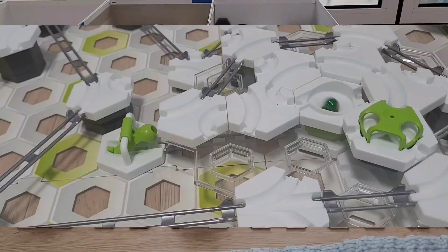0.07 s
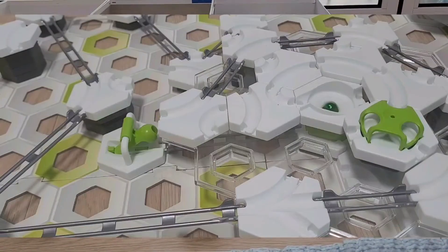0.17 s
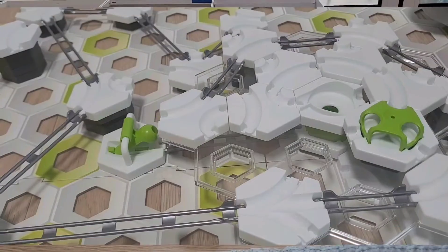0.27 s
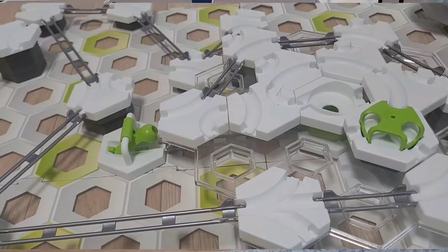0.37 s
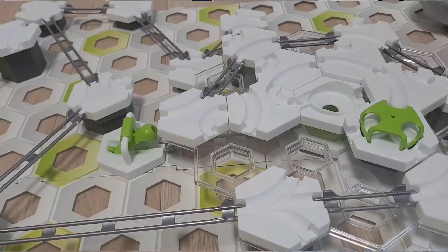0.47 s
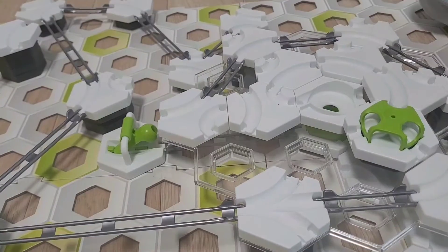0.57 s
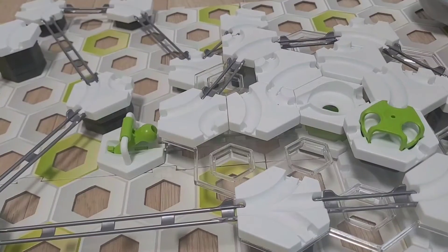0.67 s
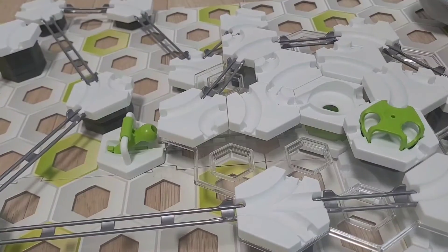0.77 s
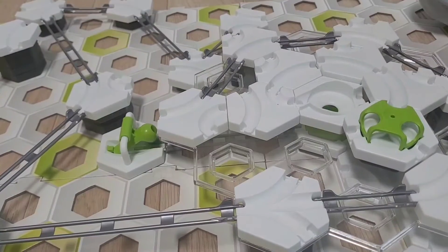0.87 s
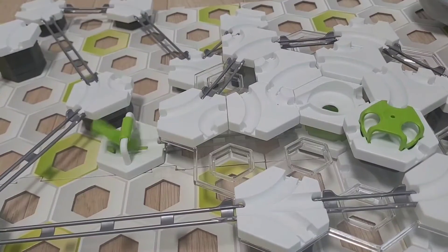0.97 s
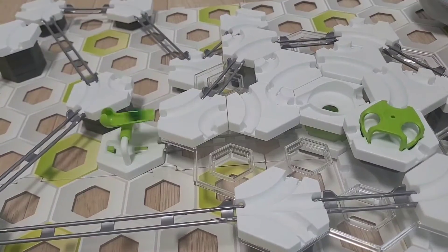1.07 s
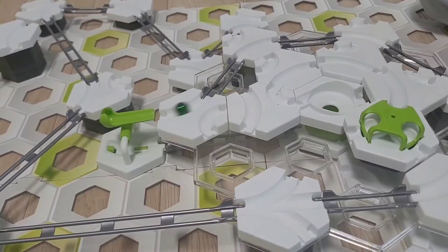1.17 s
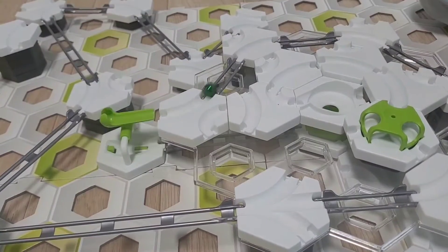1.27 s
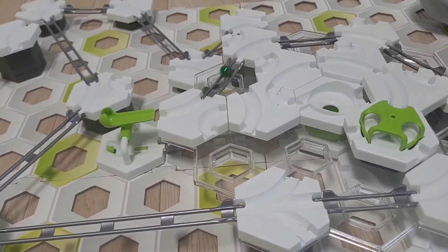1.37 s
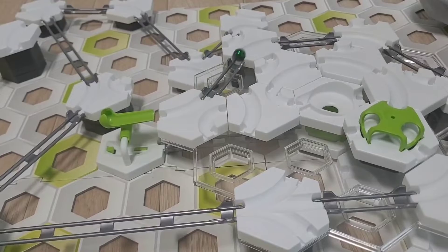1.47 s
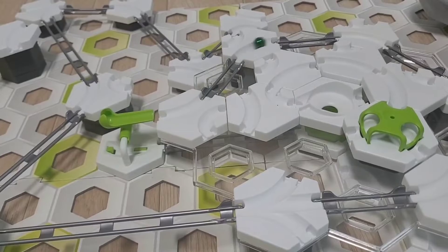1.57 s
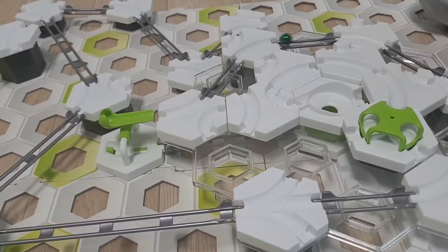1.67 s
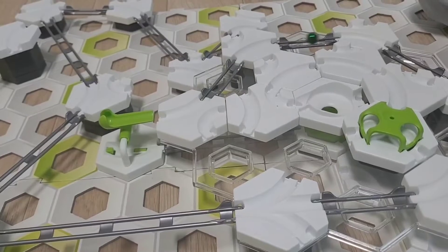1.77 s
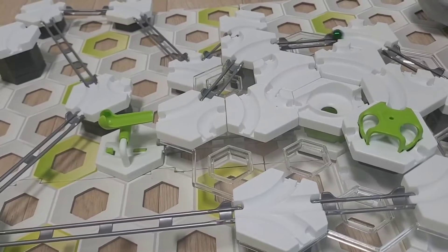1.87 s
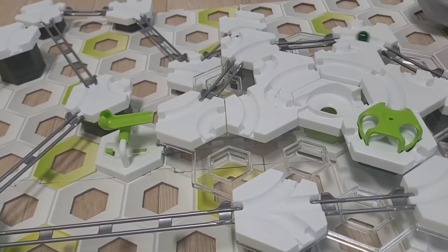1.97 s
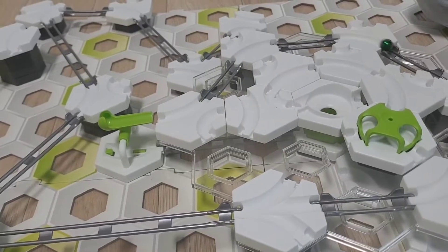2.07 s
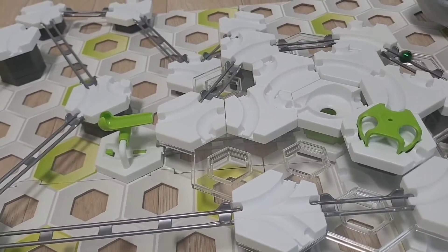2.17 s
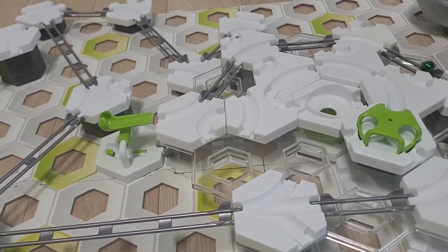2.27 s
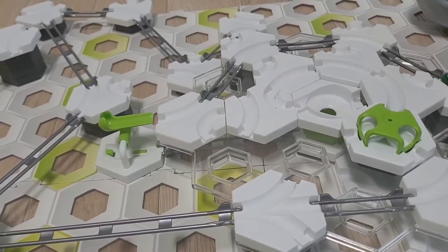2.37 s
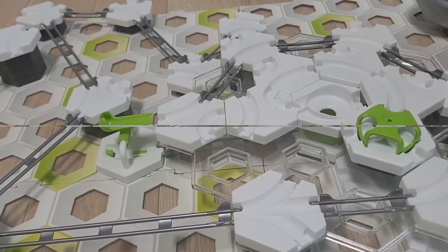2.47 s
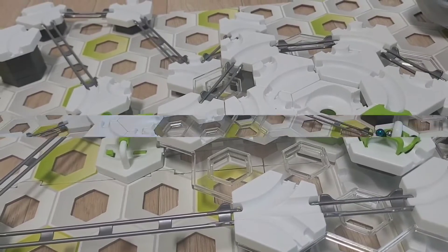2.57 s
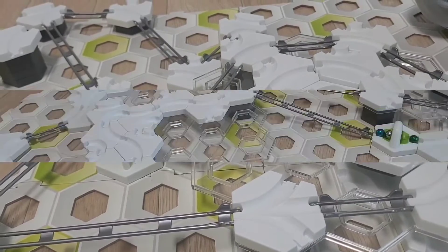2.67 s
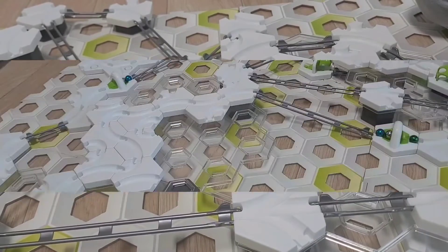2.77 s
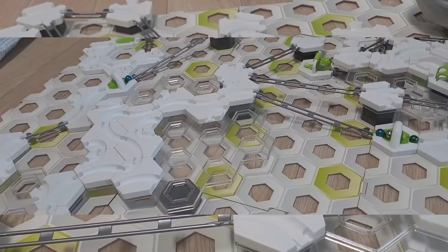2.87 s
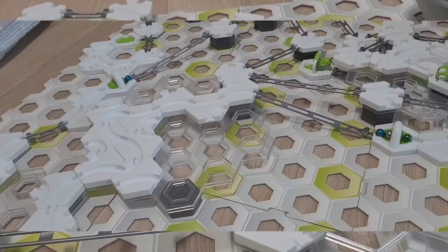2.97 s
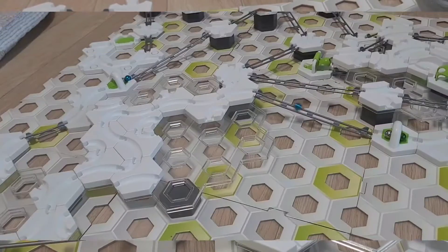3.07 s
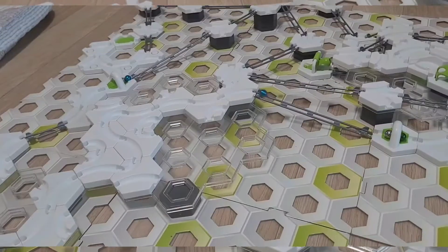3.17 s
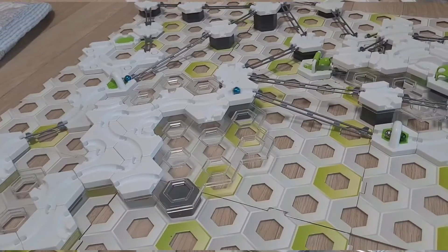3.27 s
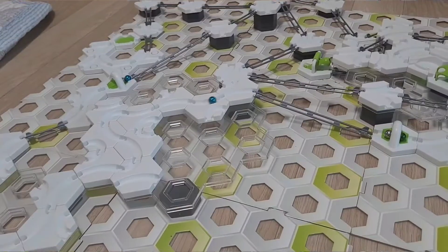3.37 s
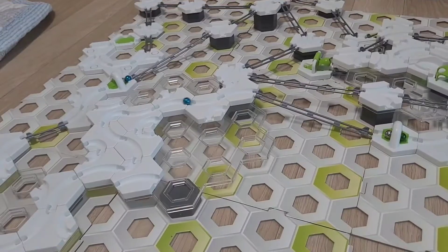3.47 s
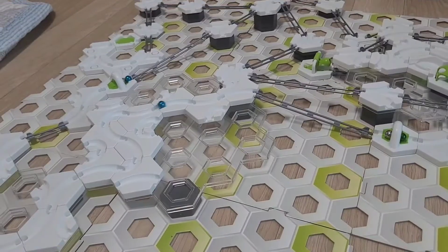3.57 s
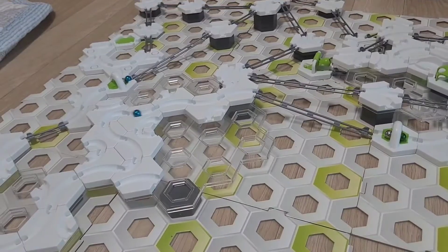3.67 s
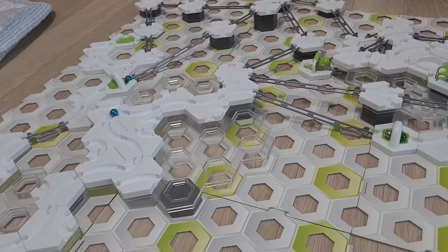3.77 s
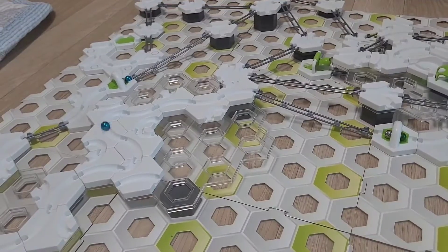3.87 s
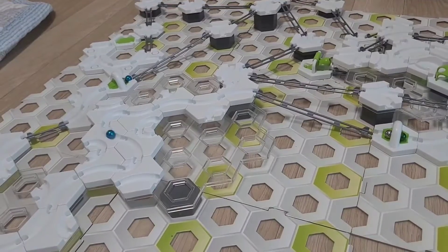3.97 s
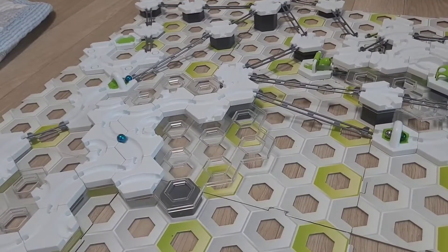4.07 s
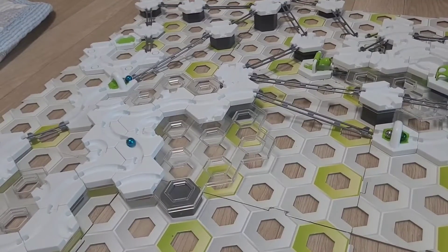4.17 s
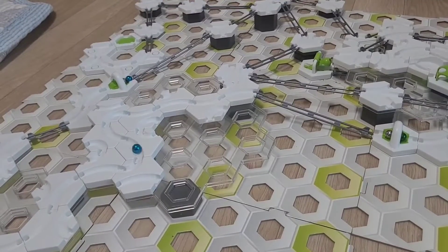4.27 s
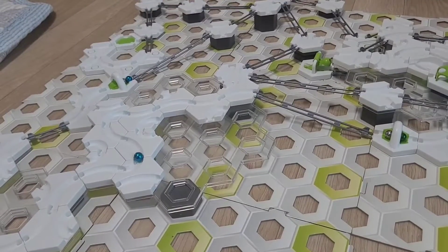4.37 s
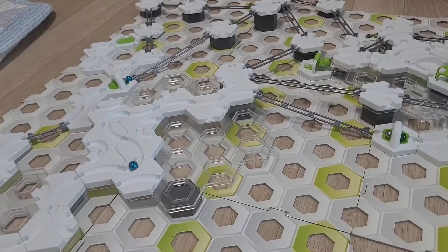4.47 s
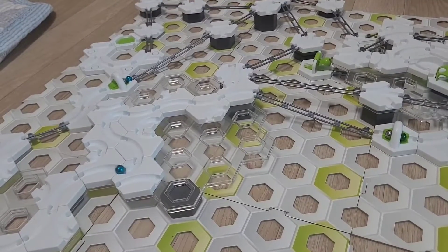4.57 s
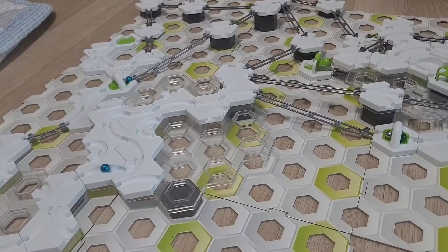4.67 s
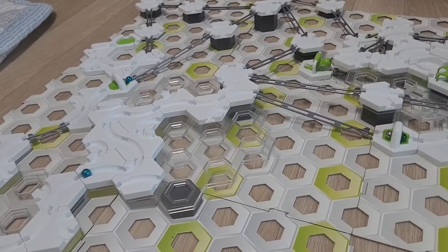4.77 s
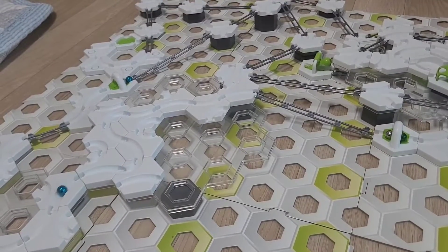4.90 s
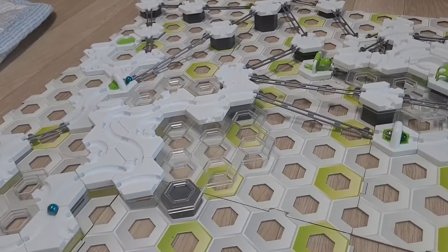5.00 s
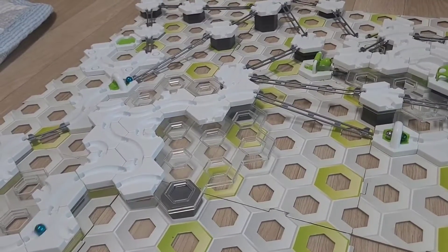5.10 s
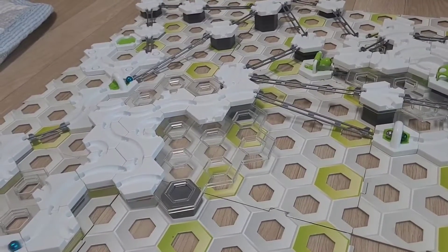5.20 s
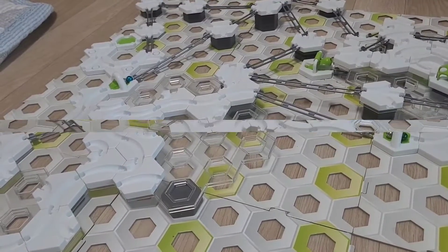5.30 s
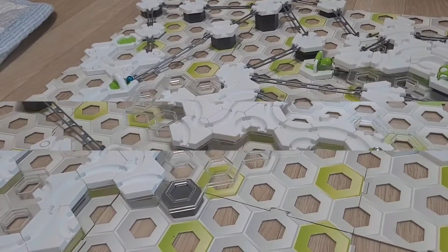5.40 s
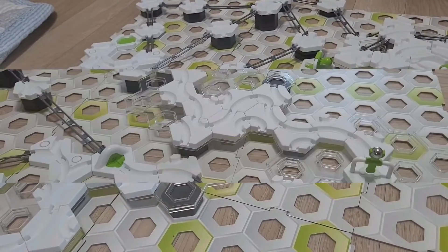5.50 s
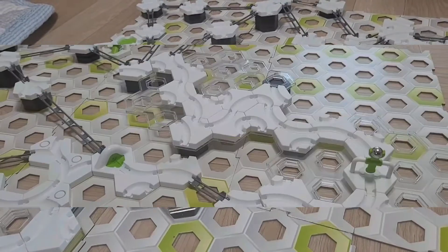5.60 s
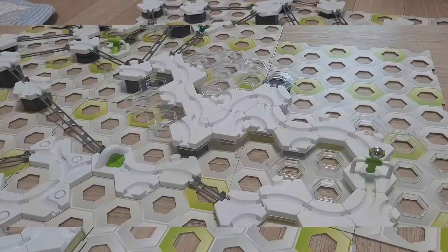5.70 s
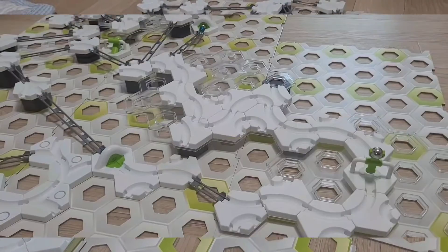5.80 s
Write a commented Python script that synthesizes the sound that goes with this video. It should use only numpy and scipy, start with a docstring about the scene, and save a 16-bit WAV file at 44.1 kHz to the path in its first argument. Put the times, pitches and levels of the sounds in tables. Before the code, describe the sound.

A toy marble run in a small room, heard close in stereo, leaning right. The first 0.17 s holds only faint hiss and soft dull bumps, mostly left, then a tiny silence. From 0.24 s a marble scuffs round a hollow plastic funnel that hums briefly, with two hard ringing knocks at 0.44 and 0.47 s. Light taps follow from 0.58 to 1.09 s, then a dense burst of sharp, bright lever clacks at 1.12-1.33 s with gritty rattle. From 1.4 s the marble rolls lightly over metal rails, clicking at joints, with a short swish near 2.2 s and a bright clack at 2.76 s. Silence at 3.03-3.12 s. At 3.17 s steel marbles clink with a thin high ring. From 3.5 s a marble rumbles over plastic tiles, tocking at seams, loudest at 5.04 s, with harder knocks at 5.55-5.61 s and a final clack at 5.8 s.

```python
"""Small room, toy marble run: marbles rumble over plastic tiles and thin metal rails, knock levers and catchers.
Scuffs, tocks, clicks and hard blows are crowds of decaying noise modes around each piece's note.
Rolling is random kicks through the track's resonances; a few sine modes ring on; dense noise echoes are the room.
Three stretches with short silences between; the first holds only soft bumps and hiss."""
import sys
import numpy as np
from scipy import signal
from scipy.fft import rfft, irfft, next_fast_len
from scipy.io import wavfile
from scipy.ndimage import uniform_filter1d

SR = 44100
rng = np.random.default_rng(int(sys.argv[2]) if len(sys.argv) > 2 else 0)


def wav_out(sig):
    """Save sig, one row per channel (or a flat mono array), as 16-bit PCM at SR to the path in sys.argv[1]."""
    wavfile.write(sys.argv[1], SR, np.round(np.clip(np.atleast_2d(sig).T, -1, 1) * 32767).astype(np.int16))


N = 257544
TIME = np.arange(N) / SR

# Pans are left minus right [dB]. Strike ranges, low to high: thock, knock, clack, tick.

# stretches with sound: (start [s], end [s])
STRETCHES = [(0, 0.17), (0.215, 3.032), (3.124, 5.801)]
# opening hiss spectrum: (frequency [Hz], relative gain [dB])
HISS_SPECTRUM = [(700, -17), (1800, -17), (2300, -2), (3200, 0), (4200, -5), (5300, -23), (8500, -25),
                 (9800, -17), (12000, -29), (16000, -33)]
# room noise spectrum: (frequency [Hz], relative gain [dB])
AIR_SPECTRUM = [(25, -23.5), (57, 1), (100, -10), (200, -12.5), (450, -17.5), (1000, -12.5), (2000, -31.5),
                (4500, -24), (9000, -23), (16000, -29)]
HISS_DB, AIR_DB = -68.99, -75.5
# dull bumps: (time [s], level before common lift [dB], top [Hz], t60 [s], pan [dB])
BUMPS = [(0.01, -53, 104, 0.56, 20), (0.052, -44.5, 360, 0.055, 25), (0.083, -46.5, 394, 0.042, 22),
         (0.092, -49.5, 96, 0.23, 17), (0.44, -41, 949, 0.08, -1), (0.467, -35, 959, 0.078, -3),
         (1.144, -53, 90, 0.22, 2.5), (2.831, -69.5, 91.3, 0.22, -11), (3.183, -64, 407, 0.28, 9),
         (5.75, -52, 95, 0.13, -17)]
# likeness of the two ears: (frequency [Hz], correlation [0-1])
LIKENESS = [(60, 0), (300, 0.8), (700, 0.91), (1400, 0.09), (3000, 0.68), (8000, 0), (16000, 0)]
# marble position: (time [s], pan before range share [dB], lead of left ear [ms])
PLACE = [(0.2, -5, -0.14), (0.9, -9, 0.023), (1.25, -1, 0.046), (1.7, -6.5, 0.09), (2.2, -6, -0.13),
         (2.9, -10, 0.008), (3.2, -2.5, 0.034), (4.4, -6, 0.066), (5.3, -2, 0.11), (5.8, -9.5, 0.17)]
# track resonances: (frequency [Hz], width [Hz], lift [dB])
TRACK_MODES = [(695, 91, 11), (807, 140, 11.5), (969, 140, 6.5), (1463, 390, 8), (2130, 65, 1.5),
               (3690, 870, 3.5), (4460, 460, 7.5), (5220, 76, 7), (5820, 580, 5), (7283, 220, 7),
               (8870, 730, 4), (11700, 390, 6), (11300, 300, -27.5)]
# room response: (frequency [Hz], t60 [s], level [dB])
ROOM = [(203.1, 0.23, 4.5), (700, 0.41, -4), (1910, 0.25, -1.5), (4900, 0.25, -9), (10000, 0.23, -1.5),
        (16050, 0.39, -12)]

# funnel hum as the marble circles: (time [s], level [dB])
CIRCLING = [(0.235, -70), (0.25, -48.5), (0.319, -69.5), (0.36, -41.5), (0.42, -57.5), (0.47, -43),
            (0.58, -52.5), (0.66, -82)]
# rolling, levels before trim: (time [s], rumble [dB], whirr [dB], grit [dB])
FUNNEL_ROLLING = [(0.25, -64, -67, -73), (0.322, -76, -82, -75.5), (0.412, -59.5, -70, -66.5),
                  (0.46, -78, -71, -71), (0.534, -64.5, -53, -46), (0.658, -77, -73, -68),
                  (0.768, -117.5, -85.5, -76), (1.01, -84, -82, -63), (1.1, -84, -64, -53)]
RAIL_ROLLING = [(1.15, -71, -44, -28.5), (1.19, -78, -49, -35.5), (1.29, -66.5, -61, -51.5),
                (1.332, -67, -47, -41), (1.43, -63.5, -54.5, -58.5), (1.56, -72.5, -75, -84),
                (1.654, -57.5, -58.5, -61), (1.92, -71.5, -61.5, -67), (2.086, -65.5, -56, -61.5),
                (2.31, -63.5, -57.5, -58.5), (2.404, -77.5, -71, -66.5), (2.498, -58, -63, -59),
                (2.654, -54, -62.5, -59), (2.754, -59, -62.5, -54), (2.842, -62, -67, -55),
                (2.952, -73.5, -77, -67), (3.02, -68, -69.5, -63)]
TILE_ROLLING = [(3.13, -62.5, -68.5, -53.5), (3.19, -80, -72, -65), (3.31, -78, -66, -62),
                (3.52, -61.5, -61, -62), (3.67, -57, -55.5, -61.5), (3.77, -58, -53, -60),
                (3.9, -55.5, -52.5, -61), (3.97, -51.5, -54, -55), (4.1, -58.5, -62.5, -67),
                (4.24, -67, -63.5, -78.5), (4.35, -63, -68.5, -82), (4.61, -61, -68, -89.5),
                (4.84, -61, -59, -62), (4.97, -62.5, -58, -61.5), (5.33, -55, -55.5, -68),
                (5.56, -56, -49.5, -65), (5.71, -63.5, -64, -66.5), (5.78, -60, -62.5, -65)]
# rolling colour: (frequency [Hz], relative gain [dB])
RAIL_COLOUR = [(88, -76), (150, -12.5), (494, -3), (649, -13.5), (1020, -24), (1210, -12), (1660, -14),
               (2870, -10.5), (6260, -25.5), (6770, -29.5), (7470, -25.5), (12200, -31.5), (16000, -48)]
TILE_COLOUR = [(88, -58), (150, -62), (226, -1.5), (524, -11.5), (689, -9), (805, -8), (1120, -7.5),
               (1420, 0.5), (2650, -8.5), (4410, -18.5), (5910, -15), (7620, -24), (9630, -23),
               (16000, -36)]

# strike ranges: (low [Hz], high [Hz])
RANGES = [(480, 1100), (1100, 2800), (2800, 6500), (6500, 14500)]
# hollow tocks, funnel scuffs and knocks early on, then tile seams:
# (time [s], level [dB], brightness [dB per range], note of the piece [Hz], t60 before range share [s])
TOCKS = [(0.2442, -52, 3.5, 764, 0.098), (0.3495, -47.5, 2.5, 720, 0.12), (0.36, -33.5, -1, 872, 0.063),
         (1.4127, -43.5, -0.5, 1330, 0.017), (3.551, -46, -3, 1586, 0.12), (3.676, -38.5, -2, 1750, 0.038),
         (3.6876, -40.5, 2, 1600, 0.048), (3.81, -39.5, -3.5, 1664, 0.093), (3.9448, -39, 0, 890, 0.043),
         (3.9555, -41, 4.5, 5240, .027), (4.007, -36, -3.5, 947, 0.028), (4.0556, -37, 3.5, 5070, 0.049),
         (4.285, -50.5, -2, 777, 0.041), (4.3065, -48, -4, 1610, .04), (4.5978, -46, -1, 1640, 0.021),
         (4.642, -50, -6.5, 826, .03), (4.8007, -38.5, -2, 1850, .035), (4.918, -47, 0, 1020, 0.028),
         (4.934, -47, -2.5, 1410, 0.051), (5.0227, -45.5, 0.5, 2100, .028), (5.037, -26.5, 1, 1350, 0.036),
         (5.179, -44.5, -5, 1340, 0.048), (5.2152, -37.5, 4, 1565, 0.035), (5.375, -44, -4.5, 1330, 0.044),
         (5.3933, -38, 0.5, 1460, 0.038), (5.5094, -45.5, -6.5, 1230, .04), (5.5638, -34, 0, 2280, 0.063),
         (5.7825, -38.5, 0.5, 1720, 0.027)]
# tock balance: (thock [dB], knock [dB], clack [dB], tick [dB])
TOCK_SHAPE_DB = (-9.5, -1, -4.5, -15)
# scuffs as the marble swirls into the funnel, then hard blows on funnel, lever and catchers:
# (time [s], clack level [dB], body re clack [dB], edge re clack [dB], note [Hz], rise [s],
# t60 before range share [s], pan before range share [dB], room send before range trim [dB])
SCUFFS_AND_BLOWS = [(0.3709, -30.5, -6.5, -10, 4200, 0.0033, 0.055, -9, -5),
                    (0.3833, -30.5, -0.5, -7.5, 4070, 0.0025, 0.06, -10.5, -10.5),
                    (0.4385, -17.5, -10, -1, 4170, 0.0003, 0.067, -10, -1.5),
                    (0.4689, -16, -18.5, -6.5, 3730, 0.00094, 0.027, -10.5, -3),
                    (1.1183, -28, -26, -2.5, 7540, 0.001, 0.028, -8, 5.5),
                    (1.1348, -29, -22, 3.5, 4500, 0.00048, 0.034, -6, 13.5),
                    (1.1434, -22.5, -29, 3, 12940, 0.00055, 0.0096, -7.5, 3),
                    (1.1587, -27.5, -15, 5.5, 13100, 0.00024, 0.043, -10.5, -3),
                    (1.2195, -32.5, -27, 1, 7800, .0013, .066, -21, 1),
                    (1.234, -33, -18.5, -4, 4460, .0028, 0.1, -8, -27),
                    (1.303, -30, -3.5, -5.5, 4540, 0.0024, 0.044, -11.5, -13),
                    (1.327, -23.5, -4.5, -5, 4490, 0.00021, 0.081, -10, -5.5),
                    (2.7627, -29.5, -16.5, -3.5, 7950, 0.00062, 0.041, -13, -13.5),
                    (2.7655, -40.5, -11, -9.5, 5050, 0.00053, 0.066, -10, -7),
                    (3.159, -46.5, -5, 7, 11400, 0.001, 0.12, -5, -3.5),
                    (3.168, -33.5, -31, 10, 10460, 0.00034, 0.0067, -19, 8.5),
                    (3.1799, -39, -9, 14.5, 13000, 0.0027, 0.13, 3, 4.5),
                    (5.5522, -28, -4, -17, 2094, 0.00048, 0.04, -3, -6),
                    (5.6076, -31, 0.5, 1.5, 6670, 0.0002, 0.034, -4.5, 1.5),
                    (5.7963, -29, -1, 10.5, 6940, 0.00025, 0.013, -3, -29)]
# light taps of marble and lever settling:
# (time [s], level [dB], edge re level [dB], rise [s], t60 before range share [s])
TAPS = [(0.5808, -38, -6.5, 0.008, .032), (0.6639, -40, -4, 0.0032, .034),
        (0.9596, -40, -5.5, 0.0065, .033), (0.981, -37.5, -4, 0.0053, .025),
        (1.035, -35.5, -6.5, .0008, .021), (1.0883, -41.5, -17.5, .0006, .013)]
# tap balance: (thock [dB], knock [dB], clack [dB])
TAP_SHAPE_DB = (-26, -12.5, -0.5)
# rail joints, two touches each: (time [s], level [dB], second touch delay [s], second touch level [dB],
# note [Hz], brightness [dB per range])
JOINTS = [(1.4544, -36, 0.0018, -43, 4200, 1), (1.5141, -43.5, 0.01, -41.5, 3730, -1),
          (1.5783, -44, .016, -38, 3270, -1), (1.6441, -38.5, 0.0081, -61, 3610, -4.5),
          (1.832, -41.5, .004, -41, 4800, 0.5), (1.9066, -46, 0.0085, -53, 3030, 2),
          (1.9818, -47.5, 0.0059, -44, 2880, -2.5), (2.0553, -45.5, 0.0036, -58, 1180, -5),
          (2.2631, -40.5, 0.0063, -47.5, 3430, 1.5), (2.346, -47, 0.0075, -44.5, 3200, -1.5),
          (2.4298, -43.5, .0122, -39, 3220, 0.5), (2.514, -39.5, 0.0051, -51, 4020, -2),
          (2.8556, -44, 0.0093, -42.5, 4900, 2.5), (2.944, -45.5, 0.0089, -43, 6800, 2.5),
          (3.369, -44.5, 0.0095, -39.5, 4800, 3.5), (3.398, -44, 0.028, -40.5, 4750, -3.5)]
# joint balance: (thock [dB], knock [dB], clack [dB], tick [dB])
JOINT_SHAPE_DB = (-17, -6, 0, -6)

# ringing of the funnel, the lever and the steel marbles in their holder:
# (frequency [Hz], level before panning [dB], t60 [s])
FUNNEL_MODES = [(781, -38, 0.1), (815, -38.5, .25), (2123, -29.5, 0.2), (3795, -45, .16), (3900, -37, .16),
                (4020, -46, 0.18), (5540, -49.5, .19)]
LEVER_MODES = [(4270, -29, 0.031), (5600, -45, .04)]
STEEL_MODES = [(229, -59.5, 0.38), (960, -60, .4), (10346, -43.5, .26), (11353, -39, .26),
               (12246, -34, .28), (12472, -39.5, .3), (13175, -38, .3), (14033, -40, .26)]
# thin whirr resonances: (frequency [Hz], relative level [dB])
WHIRR_MODES = [(1020, -17.5), (2220, -21), (4330, -1), (8900, -8.5)]


def from_db(db):
    """Decibels to gain."""
    return 10 ** (np.asarray(db) / 20)


def rms_one(x):
    """Scales to rms 1."""
    return x / np.sqrt(np.mean(x ** 2) + 1e-20)


def in_time(rows, at=TIME):
    """Each column of a time curve, interpolated."""
    s, *columns = np.transpose(rows)
    return [np.interp(at, s, column) for column in columns]


def at_hz(points, hz, axis=1):
    """One table column, interpolated over log frequency."""
    points = np.array(points)
    return np.interp(np.log(np.maximum(hz, 1)), np.log(points[:, 0]), points[:, axis])


def during(start_s, end_s):
    """1 between two times, with 20 ms edges."""
    return np.interp(TIME, [start_s - .01, start_s + .01, end_s - .01, end_s + .01], [0, 1, 1, 0])


def drift(per_s):
    """Smooth random wander: Gaussian knots joined by lines."""
    knots = rng.standard_normal(512)
    return np.interp(TIME * per_s, np.arange(len(knots)), knots)


def band(x, low_hz, high_hz, order=3):
    """Band-pass."""
    edges = [low_hz, min(high_hz, .48 * SR)]
    return signal.sosfilt(signal.butter(order, edges, "band", fs=SR, output="sos"), x)


def resonance(x, hz, width_hz):
    """One resonance, unity gain at its peak."""
    return signal.lfilter(*signal.iirpeak(hz, hz / width_hz, fs=SR), x)


def coloured(x, spectrum):
    """Imposes a spectrum; rms 1."""
    size = next_fast_len(N)
    gain = from_db(at_hz(spectrum, np.fft.rfftfreq(size, 1 / SR)))
    return rms_one(irfft(rfft(x, size) * gain, size)[..., :N])


def two_ears(pair, lead_ms=0):
    """Mixes two unrelated signals to left and right with likeness set by frequency; left leads."""
    length = pair.shape[1]
    size = next_fast_len(length)
    hz = np.fft.rfftfreq(size, 1 / SR)
    alike = np.clip(at_hz(LIKENESS, hz), 0, 1)
    mid, side = rfft(pair, size)
    sign = np.array([[1], [-1]])
    ears = np.sqrt((1 + alike) / 2) * mid + sign * np.sqrt((1 - alike) / 2) * side
    shift = np.exp(sign * 1j * np.pi * hz * lead_ms / 1000)  # half the lead on each ear
    return irfft(ears * shift, size)[:, :length]


def panned(pan_db):
    """Left and right gains of constant power."""
    gains = from_db(np.array([[.5], [-.5]]) * pan_db)
    return gains / np.sqrt(np.mean(gains ** 2, axis=0))


def add(out, s, sound):
    """Mixes a sound in at a given time."""
    start = max(int(s * SR), 0)
    out[:, start:start + sound.shape[1]] += sound[:, :N - start]


def track_body(x):
    """Hollow pieces filter whatever shakes them, one resonance after another."""
    for hz, width_hz, lift_db in TRACK_MODES:
        x = x + (from_db(lift_db) - 1) * resonance(x, hz, width_hz)
    return x


def background(hiss_pan_db=15):
    """Thin hiss, mostly left, in the first stretch; quiet room noise after it."""
    air = from_db(AIR_DB) * coloured(two_ears(rng.standard_normal((2, N))), AIR_SPECTRUM)
    hiss = from_db(HISS_DB) * coloured(rng.standard_normal((2, N)), HISS_SPECTRUM) * panned(hiss_pan_db)
    return np.where(TIME < STRETCHES[0][1], hiss, air)


def bumps(rise_s=.003, lift_db=8.5):
    """Soft, dull thuds: band-limited noise, quick rise, exponential decay."""
    out, t = np.zeros((2, N)), np.arange(SR // 4) / SR
    for s, level_db, top_hz, t60_s, pan_db in BUMPS:
        noise = two_ears(rng.standard_normal((2, SR // 2)))
        noise = band(noise, top_hz / 3, top_hz)[:, -len(t):]  # filter settled
        thud = noise * (1 - np.exp(-t / rise_s)) * from_db(-60 * t / t60_s)
        add(out, s, thud / np.abs(thud).max() * from_db(level_db + lift_db) * panned(pan_db))
    return out


def funnel_hum(note_hz=790, section_width_hz=330, pan_db=-2):
    """The hollow funnel hums as the marble circles: noise through two equal resonances."""
    noise = two_ears(rng.standard_normal((2, N)))
    tone = resonance(resonance(noise, note_hz, section_width_hz), note_hz, section_width_hz)
    level = from_db(in_time(CIRCLING)[0]) * during(CIRCLING[0][0], CIRCLING[-1][0])
    return level * rms_one(tone) * panned(pan_db)


def tocks(rise_s=0.0015, pan_db=-8.0, room_db=-2):
    """Hollow tocks: funnel scuffs and knocks early on, then tile seams; each tilts bright or dull."""
    steps = np.arange(len(RANGES)) - 1
    return [(s, db + np.array(TOCK_SHAPE_DB) + bright_db * steps, note_hz, rise_s, t60_s, pan_db, room_db)
            for s, db, bright_db, note_hz, t60_s in TOCKS]


def strikes(blows, crack=0.56, crack_at_s=0.0028, crack_width_s=0.00031, note_lift_db=9, note_q=13,
            ring_share=(1.3, 1.2, 1.0, .9), pan_share=(.2, .45, 1.1, .8), room_trim_db=(0, 0, 0, -1)):
    """Each strike excites short-lived modes around its piece's note; returns direct sound and room feed."""
    direct, to_room = np.zeros((2, 2, N))
    t = np.arange(3584) / SR
    first = t < .006  # level reference [s]
    white = track_body(rng.standard_normal((len(blows), 2, 4096)))
    crowd = []
    for noise, (s, _, note_hz, *_) in zip(white, blows):
        noise = noise + from_db(note_lift_db) * resonance(noise, note_hz, note_hz / note_q)
        crowd.append(two_ears(noise, in_time(PLACE, s)[1]))
    # a brief crack about 3 ms into each blow
    crack_gain = 1 + crack * np.exp(-((t - crack_at_s) / crack_width_s) ** 2)
    for k, (low_hz, high_hz) in enumerate(RANGES):
        in_range = band(np.array(crowd), low_hz, high_hz)[..., -len(t):]
        for modes, (s, levels_db, _, rise_s, t60_s, pan_db, wet_db) in zip(in_range, blows):
            fade = from_db(-60 * t / (t60_s * ring_share[k]))
            blow = modes * (1 - np.exp(-t / rise_s)) * fade * crack_gain
            blow = blow * from_db(levels_db[k]) / np.sqrt(np.mean(blow[:, first] ** 2))
            blow = blow * panned(pan_db * pan_share[k])  # long waves diffract and stay central
            add(direct, s, blow)
            add(to_room, s, blow * from_db(wet_db + room_trim_db[k]))
    return direct, to_room


def room(x, delay_s=0.0051, build_s=0.004):
    """Dense reflections swell just after the direct sound, then decay at a rate set by frequency."""
    t = np.arange(SR // 2) / SR
    swell = 1 - np.exp(-np.maximum(t - delay_s, 0) / build_s)
    edges_hz, echo = np.geomspace(150, 18000, 9), 0
    for low_hz, high_hz in zip(edges_hz, edges_hz[1:]):
        hz = np.sqrt(low_hz * high_hz)
        fade = swell * from_db(-60 * t / at_hz(ROOM, hz))
        noise = band(two_ears(rng.standard_normal((2, len(t)))), low_hz, high_hz)
        echo = echo + noise * fade / np.linalg.norm(fade) * from_db(at_hz(ROOM, hz, axis=2))
    mixed = x + 0.037 * x[::-1]  # walls pass some of each side to the other
    return signal.fftconvolve(mixed, echo, axes=1)[:, :N]


def passing_modes(x, lift_db=3, swing_db=8, width_hz=28, changes_per_s=10, glide=.035, turns_per_s=7, count=16):
    """The marble crosses nodes and bellies of the low modes: each swells at random; all glide a little."""
    singing = 0
    for hz in np.geomspace(560, 2300, count):
        swell_db = lift_db + swing_db * np.minimum(drift(changes_per_s), 1.3)
        singing = singing + resonance(x, hz, width_hz) * from_db(swell_db)
    warped = TIME + np.cumsum(glide * drift(turns_per_s)) / SR
    return x + np.array([np.interp(warped, TIME, ear) for ear in singing])


def rolling(curve, colour, bumps_per_s, spread_db, smooth_db, wobble_db, trim_db):
    """Tiny uneven bumps kick the track; the marble sways and presses unevenly."""
    sizes = from_db(spread_db * np.minimum(rng.exponential(1, N), 4.5))
    sizes = sizes * (rng.random(N) < bumps_per_s / SR)
    kicks = rms_one(sizes * rng.standard_normal((2, N)))
    kicks = kicks + from_db(smooth_db) * rng.standard_normal((2, N))
    kicks = kicks * from_db(wobble_db * np.minimum(drift(70), 1.2))
    start_s, end_s = curve[0][0], curve[-1][0]
    lead_ms = in_time(PLACE, (start_s + end_s) / 2)[1]
    shake = coloured(passing_modes(track_body(two_ears(kicks, lead_ms))), colour)
    pan_db, out = in_time(PLACE)[0], 0
    ranges_hz = [(150, 1100), (1100, 2500), (2700, 16000)]  # rumble, whirr, grit
    for (low_hz, high_hz), level_db, extra_db, share in zip(ranges_hz, in_time(curve), trim_db, (.25, .6, 1.3)):
        layer = rms_one(band(shake, low_hz, high_hz, order=4))
        out = out + layer * from_db(level_db + extra_db) * panned(pan_db * share)
    return out * ((TIME > start_s - .01) & (TIME < end_s + .02))


def scuffs_and_blows(thock_follows=0.84, thock_db=-8):
    """Body is the weight in the hollow piece, edge the bright top of the contact; weak body, weaker thock."""
    return [(s, db + np.array([thock_follows * body_db + thock_db, body_db, 0, edge_db]), *ringing)
            for s, db, body_db, edge_db, *ringing in SCUFFS_AND_BLOWS]


def ring_on(times_s, modes, pan_db, rise_s=0.00067):
    """A piece's clearest modes hang on after the blow as decaying sines."""
    out, t = np.zeros((2, N)), np.arange(SR // 2) / SR
    for s in times_s:
        for hz, db, t60_s in modes:
            fade = from_db(db - 60 * t / t60_s) * (1 - np.exp(-t / rise_s))
            unlike = 1 - np.clip(at_hz(LIKENESS, hz), 0, 1)
            phases = rng.uniform(0, 2 * np.pi) + rng.standard_normal((2, 1)) * unlike
            add(out, s, fade * np.sin(2 * np.pi * hz * t + phases) * panned(pan_db))
    return out


def taps(note_hz=4320, pan_db=-12, room_db=-9):
    """Light taps, all exciting the same small piece's note."""
    return [(s, db + np.array([*TAP_SHAPE_DB, edge_db]), note_hz, rise_s, t60_s, pan_db, room_db)
            for s, db, edge_db, rise_s, t60_s in TAPS]


def thin_whirr(level_db=-69, section_width_hz=600, pan_db=-12):
    """Faint, thin whirr: noise through a few doubled resonances."""
    noise, whirr = two_ears(rng.standard_normal((2, N))), 0
    for hz, db in WHIRR_MODES:
        mode = resonance(resonance(noise, hz, section_width_hz), hz, section_width_hz)
        whirr = whirr + from_db(db) * rms_one(mode)
    return from_db(level_db) * whirr * during(0.66, 1.1) * panned(pan_db)


def joints(first_rise_s=0.00046, second_rise_s=0.00091, first_t60_s=0.064, second_t60_s=0.056,
           pan_db=-12, room_db=-7):
    """The marble clicks off one piece and lands on the next a moment later."""
    steps, blows = np.arange(len(RANGES)) - 2, []
    for s, db, after_s, second_db, note_hz, bright_db in JOINTS:
        shape_db = np.array(JOINT_SHAPE_DB) + bright_db * steps
        blows.append((s, db + shape_db, note_hz, first_rise_s, first_t60_s, pan_db, room_db))
        blows.append((s + after_s, second_db + shape_db, note_hz, second_rise_s, second_t60_s, pan_db, room_db))
    return blows


def rail_scrape(level_db=-58, low_hz=2800, high_hz=12500, flutter_db=3, pan_db=-14):
    """The marble rubs the rail in a bend: short bright swish of fluttering noise."""
    rub = band(track_body(two_ears(rng.standard_normal((2, N)))), low_hz, high_hz, order=1)
    level = from_db(level_db + flutter_db * drift(80.94)) * during(2.178, 2.27)
    return level * rms_one(rub) * panned(pan_db)


def scene():
    """Strikes and their room, over rolling, ringing and background."""
    direct, to_room = strikes(tocks() + scuffs_and_blows() + taps() + joints())
    rings = ring_on([0.441], FUNNEL_MODES, pan_db=-0.5)
    rings = rings + ring_on([0.961, 0.983], LEVER_MODES, pan_db=-26)
    rings = rings + ring_on([3.169], STEEL_MODES, pan_db=3)
    rails = rolling(FUNNEL_ROLLING + RAIL_ROLLING, RAIL_COLOUR, bumps_per_s=500, spread_db=1.5,
                    smooth_db=-0.5, wobble_db=7.0, trim_db=(2, 2, 1))
    tiles = rolling(TILE_ROLLING, TILE_COLOUR, bumps_per_s=900, spread_db=-0.5,
                    smooth_db=1, wobble_db=3.0, trim_db=(1.5, 2, 1))
    steady = background() + bumps() + funnel_hum() + thin_whirr() + rail_scrape()
    return direct + room(to_room) + rings + rails + tiles + steady


def record(dry):
    """Silence outside the stretches; steep low-pass at 16.1 kHz."""
    on = sum((TIME >= start_s) & (TIME < end_s) for start_s, end_s in STRETCHES)
    gated = dry * uniform_filter1d(on.astype(float), size=64)
    return signal.sosfilt(signal.ellip(10, .1, 80, 16100, fs=SR, output="sos"), gated)


dry = scene()
out = record(dry)
wav_out(out)
```